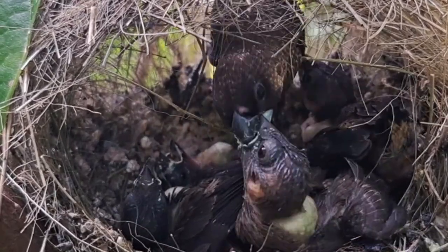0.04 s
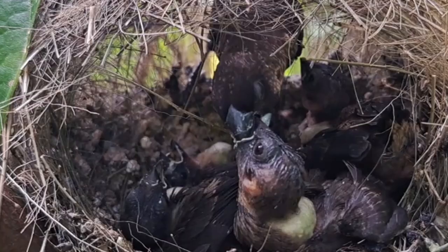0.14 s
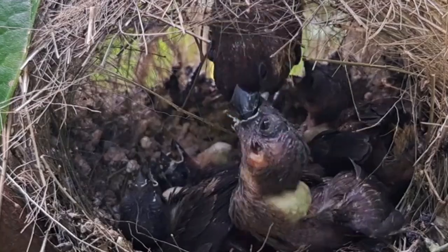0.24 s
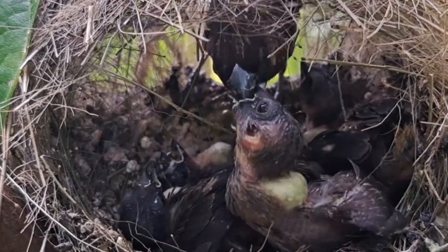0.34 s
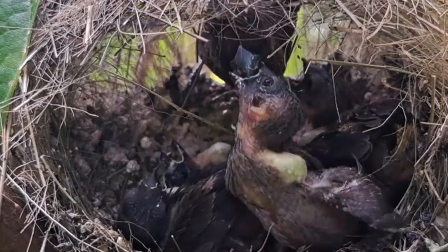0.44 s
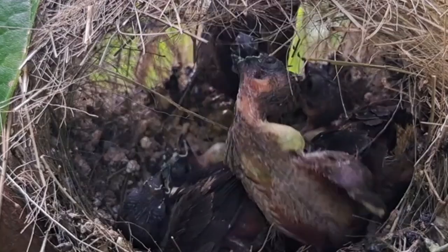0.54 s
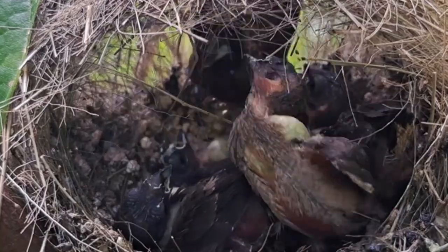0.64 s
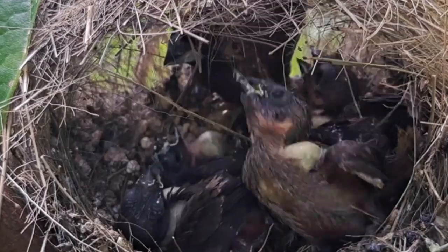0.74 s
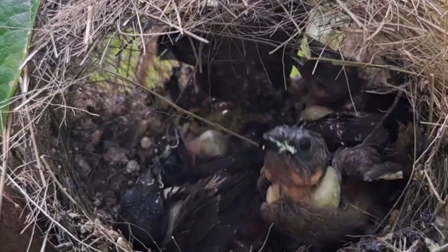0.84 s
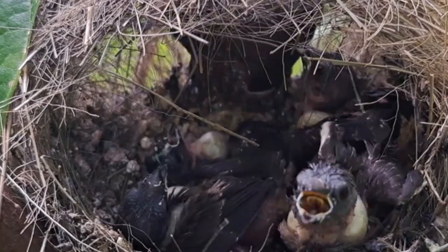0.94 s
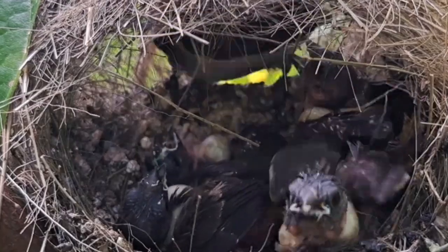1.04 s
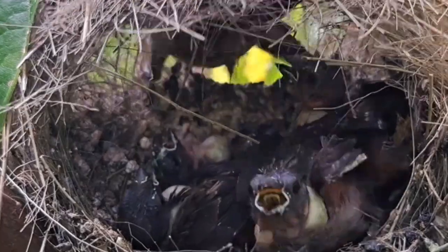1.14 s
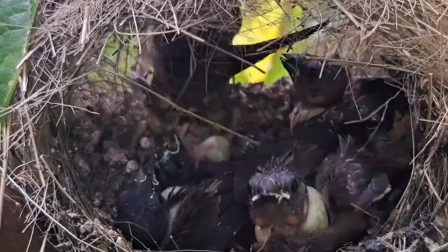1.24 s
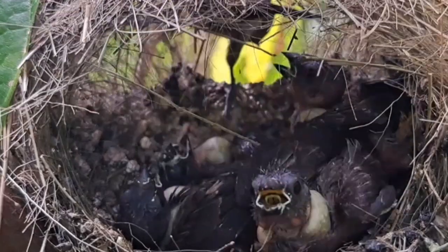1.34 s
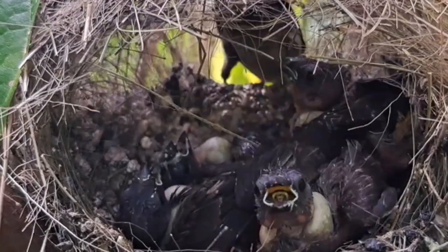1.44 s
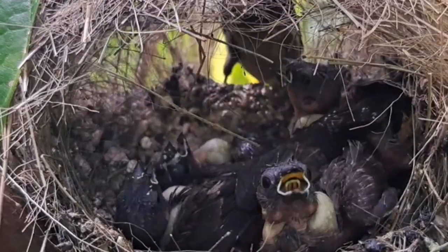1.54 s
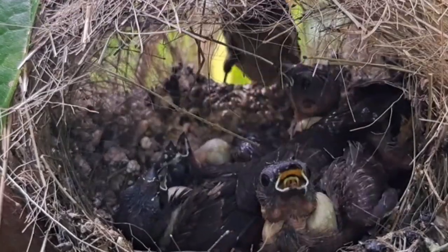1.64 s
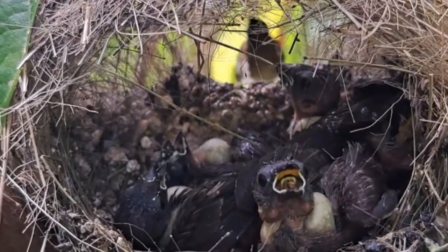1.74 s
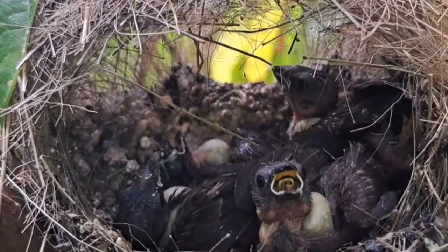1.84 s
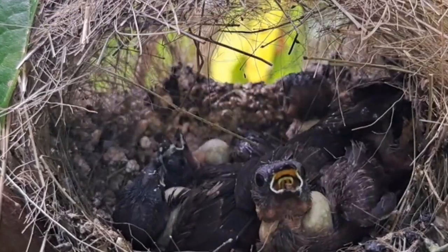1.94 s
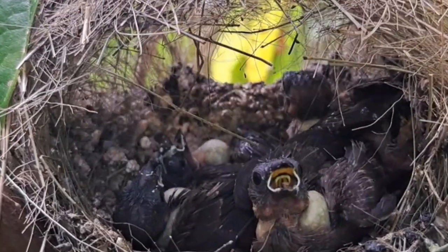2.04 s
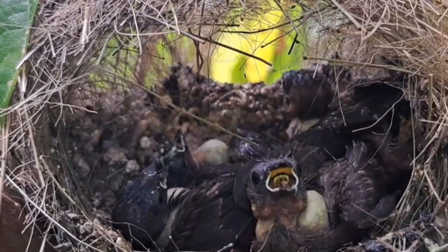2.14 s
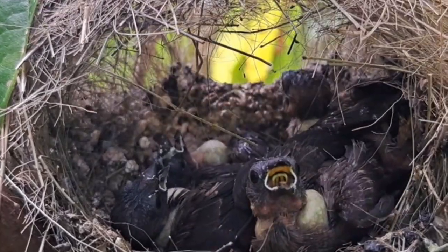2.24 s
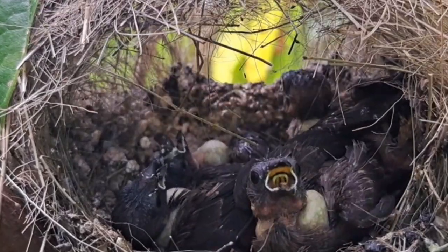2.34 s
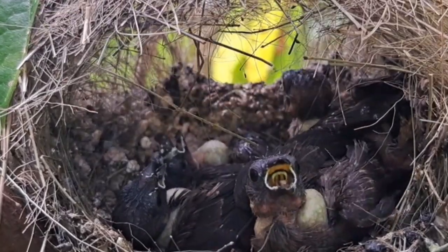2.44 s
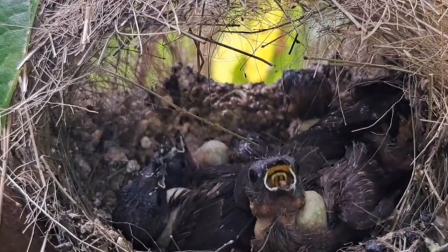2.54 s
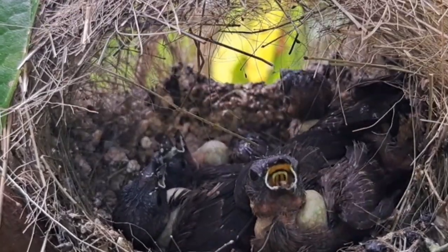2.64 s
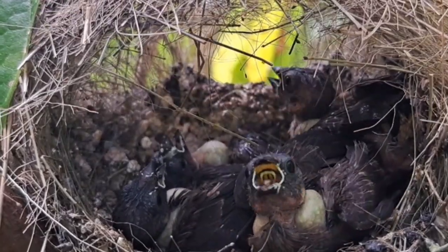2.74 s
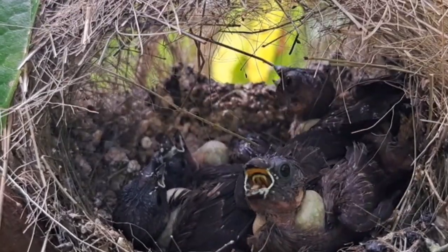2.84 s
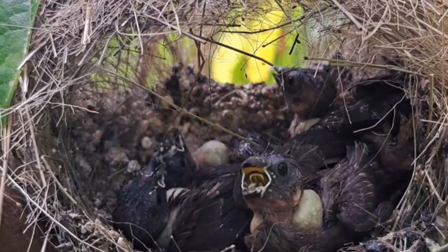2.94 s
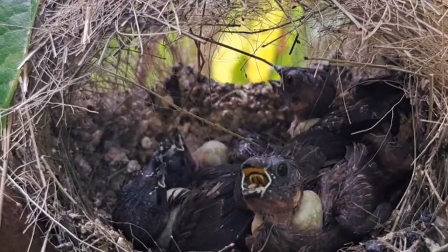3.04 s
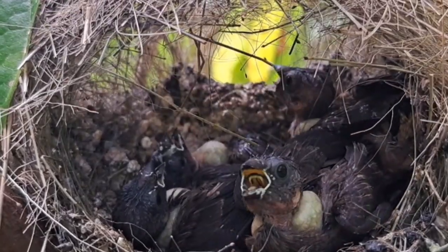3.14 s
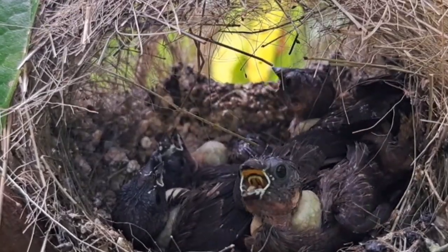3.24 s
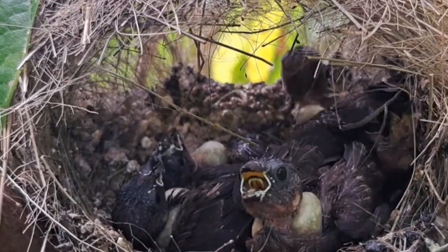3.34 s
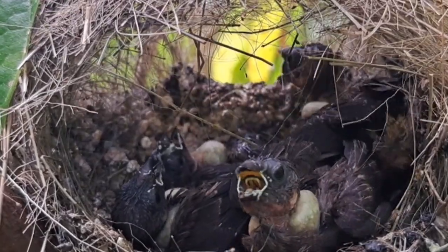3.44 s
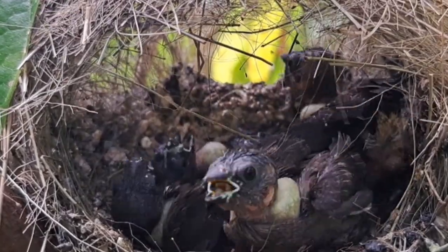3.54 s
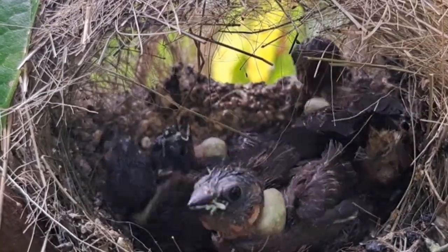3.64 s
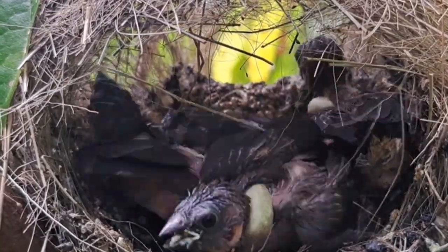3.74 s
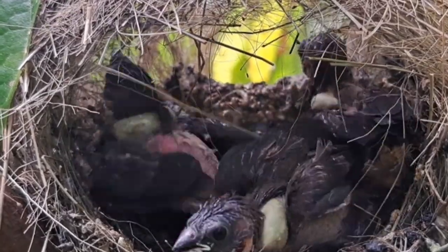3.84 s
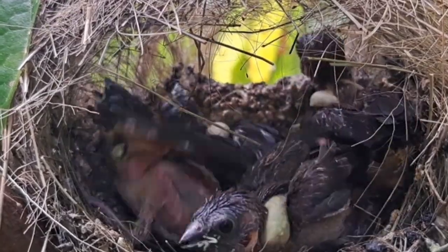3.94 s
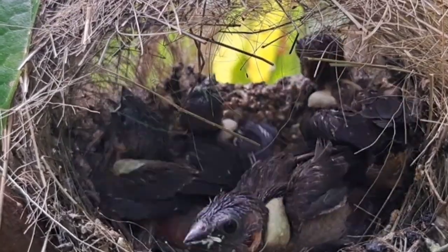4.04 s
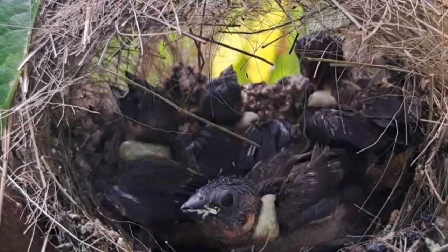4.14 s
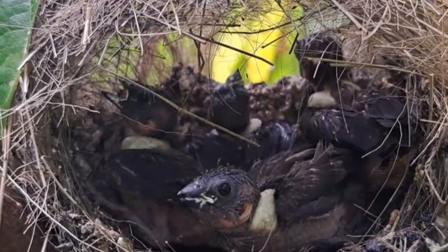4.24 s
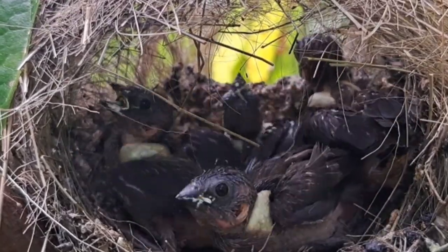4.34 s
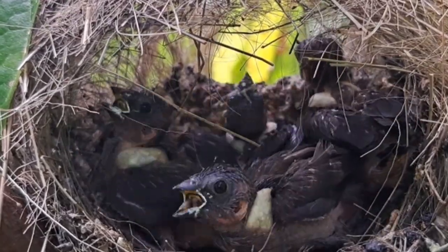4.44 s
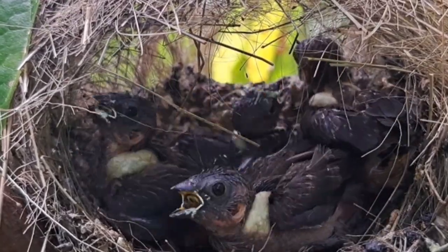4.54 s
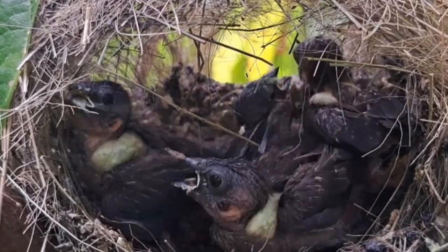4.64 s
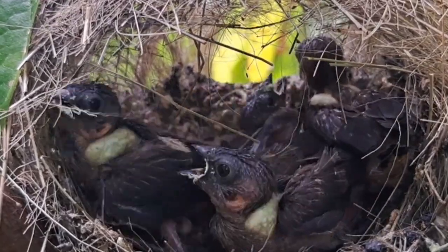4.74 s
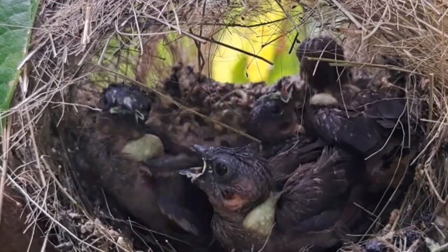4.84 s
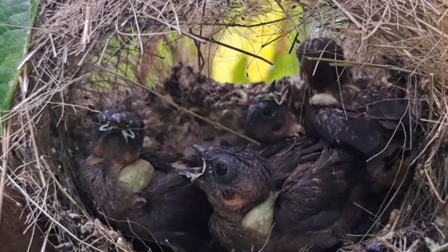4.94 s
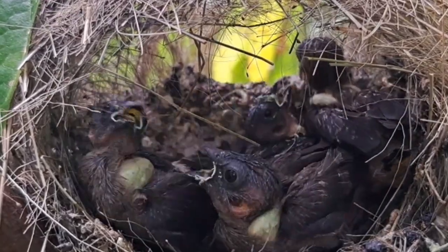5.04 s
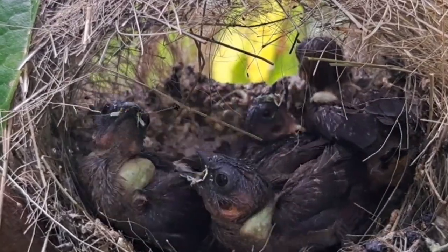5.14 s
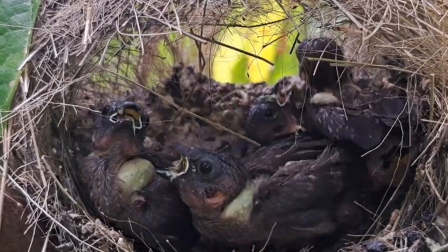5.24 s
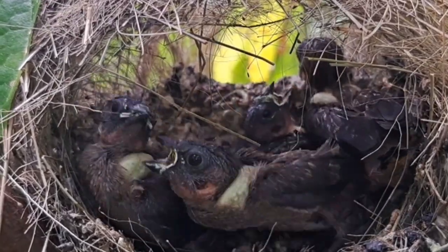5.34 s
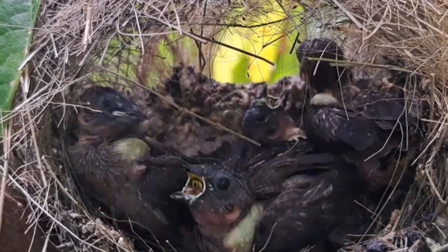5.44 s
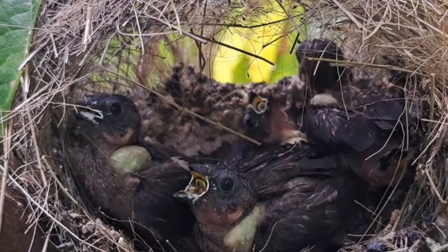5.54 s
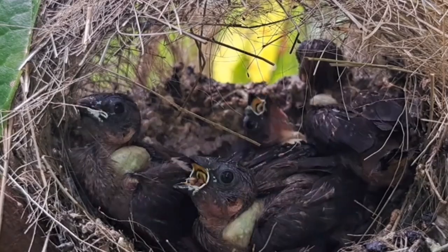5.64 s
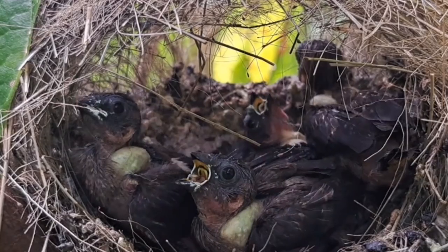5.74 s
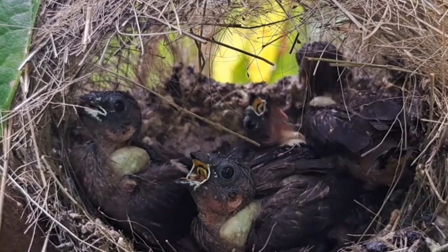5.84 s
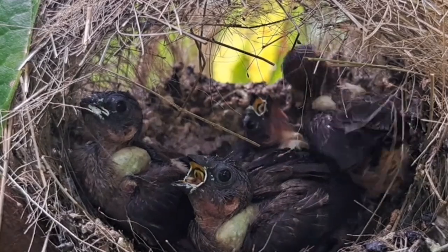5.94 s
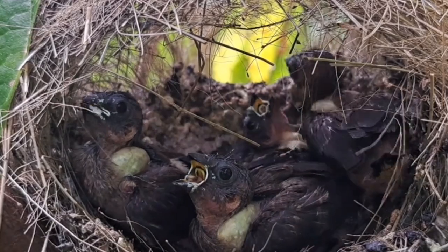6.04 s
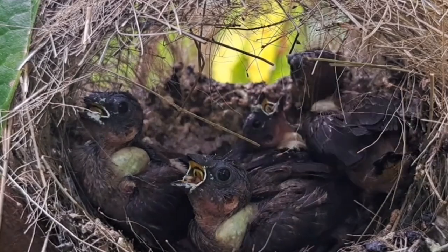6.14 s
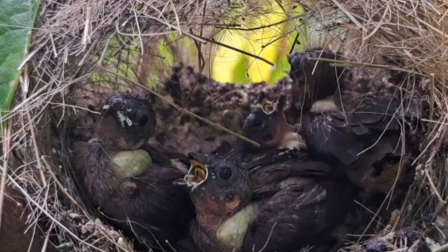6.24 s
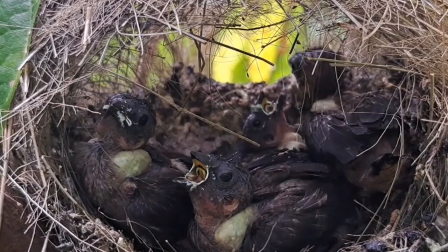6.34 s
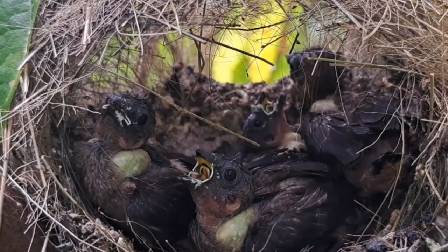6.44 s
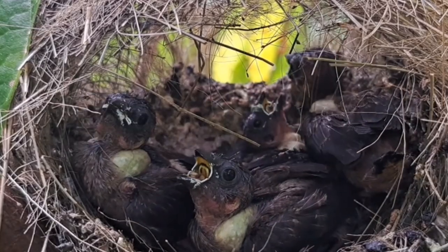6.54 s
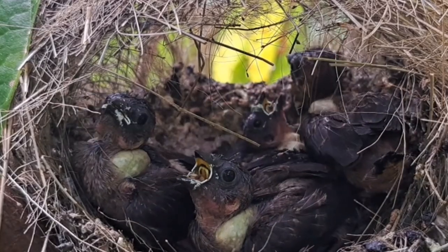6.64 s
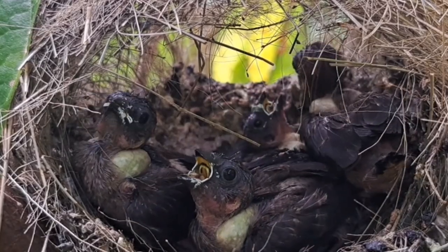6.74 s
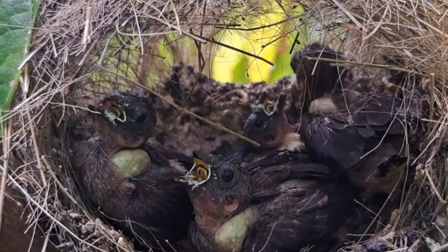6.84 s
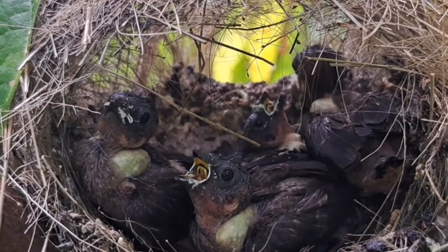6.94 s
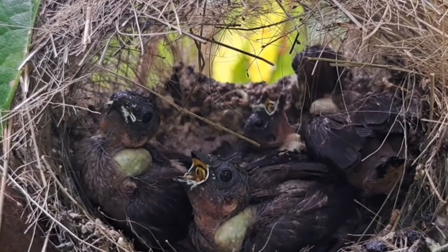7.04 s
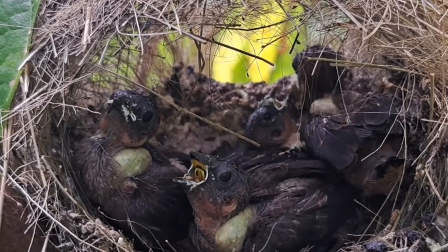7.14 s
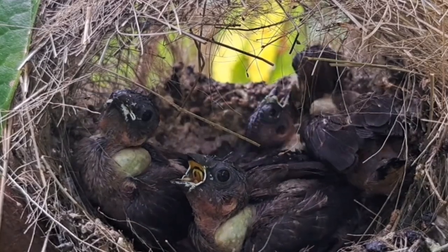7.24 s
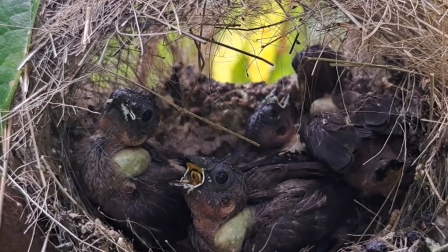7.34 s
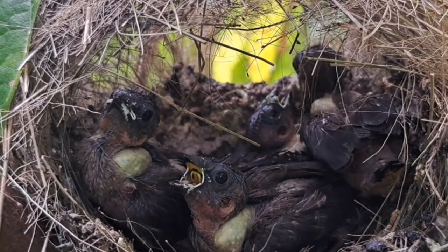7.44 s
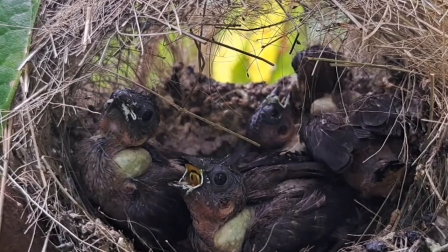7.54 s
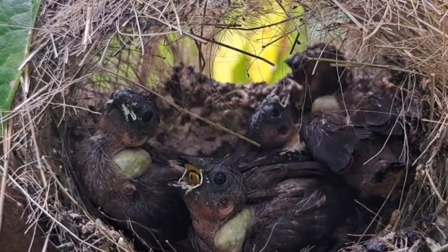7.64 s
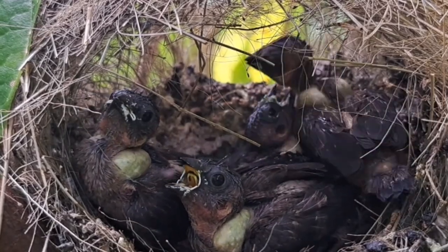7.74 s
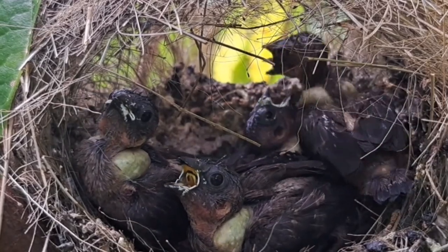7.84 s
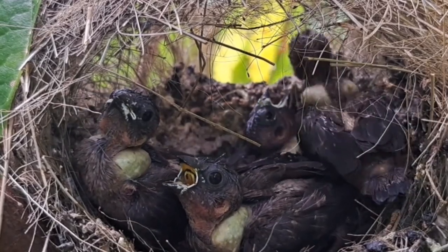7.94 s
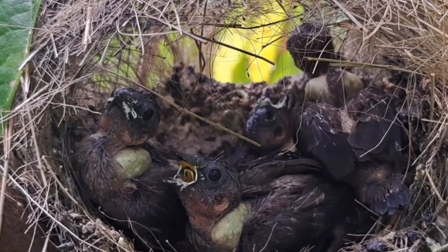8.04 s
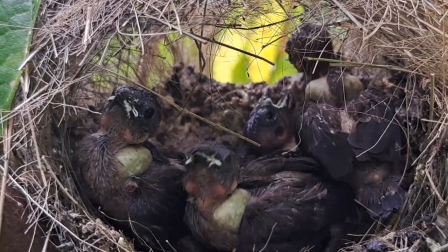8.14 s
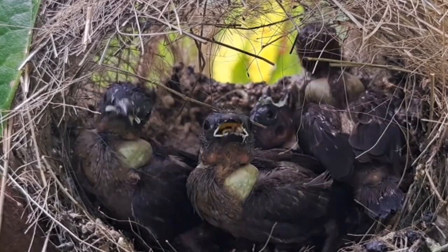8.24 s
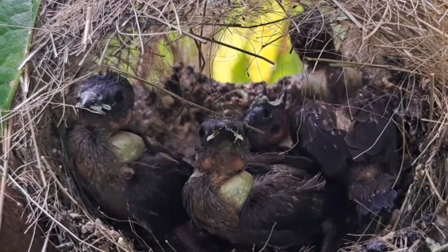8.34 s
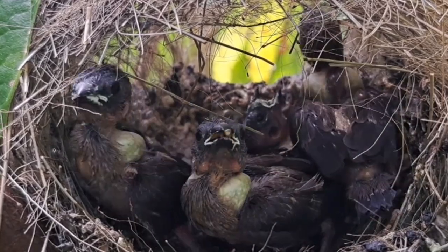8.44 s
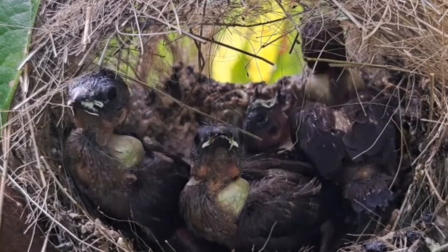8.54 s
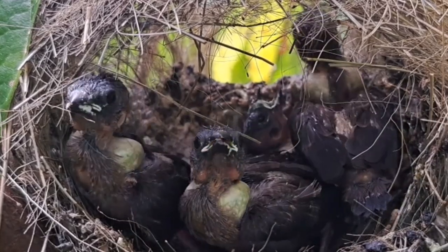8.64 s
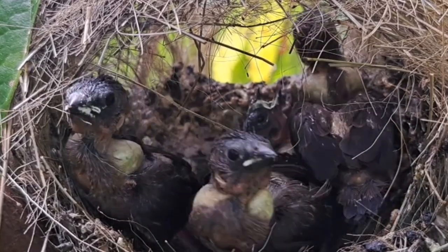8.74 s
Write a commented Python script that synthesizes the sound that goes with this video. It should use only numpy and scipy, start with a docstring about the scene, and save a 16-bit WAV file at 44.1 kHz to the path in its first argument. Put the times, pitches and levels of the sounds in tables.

```python
"""Nestlings beg in a small woven grass nest, close to a stereo microphone. Each chirp is a puff of air
and a membrane whistle that scoops up, climbs and hooks down, in one of four voices: clear, raspy, buzzy,
swelling. The calls overlap while a parent visits and thin out after it flutters away. The chicks bump
the nest. Outside, a faint insect-like trill comes and goes over a low rumble and a far engine."""
import sys
import numpy as np
from scipy import signal
from scipy.fft import rfft, irfft, next_fast_len
from scipy.io import wavfile
from scipy.ndimage import uniform_filter1d, minimum_filter1d, map_coordinates

SR = 44100
rng = np.random.default_rng(int(sys.argv[2]) if len(sys.argv) > 2 else 0)


def to_wav(sig):
    """Store sig (one row per channel, or 1-D mono) as 16-bit WAV at the path in sys.argv[1].

    Samples outside -1..1 are clipped; the rate is SR.
    """
    pcm = np.clip(np.atleast_2d(sig), -1, 1) * 32767
    pcm = np.round(pcm).astype(np.int16)
    wavfile.write(sys.argv[1], SR, pcm.T)  # frames by channels


N = 388080  # 8.8 s
BAND_LIMIT_HZ = 15550
HOOK_S, AIR_LEAD_S = 0.021, 0.022  # closing pitch drop; air starts ahead of the whistle


def amp(db):
    """Decibels to gain."""
    return 10 ** (np.asarray(db) / 20)


def unit(x):
    """Scale to rms 1."""
    return x / np.sqrt(np.mean(x ** 2) + 1e-20)


def ramp(x):
    """Smooth step from 0 to 1."""
    return np.sin(np.pi / 2 * np.clip(x, 0, 1)) ** 2


def wobble(knots_per_s, size):
    """Smooth random curve, rms near 1."""
    knots = rng.standard_normal(int(size * knots_per_s / SR) + 2)
    return map_coordinates(knots, [np.arange(size) * knots_per_s / SR], mode="nearest")


def along(points, hz):
    """Interpolate (Hz, value) points on a log frequency axis."""
    points_hz, values = np.transpose(points)
    return np.interp(np.log(hz + 1), np.log(points_hz), values)


def filtered(x, response):
    """Apply a frequency response, given as a function of Hz."""
    size = x.shape[-1]
    padded = next_fast_len(size + 1024)
    return irfft(rfft(x, padded) * response(np.fft.rfftfreq(padded, 1 / SR)), padded)[..., :size]


def noise(colour, shape):
    """Noise of rms 1 with a (Hz, dB) spectrum."""
    return unit(filtered(rng.standard_normal(shape), lambda hz: amp(along(colour, hz))))


def add(track, start_s, sound):
    """Mix a sound into a track."""
    at = round(start_s * SR) + np.arange(sound.shape[-1])
    inside = (at >= 0) & (at < N)
    track[..., at[inside]] += sound[..., inside]


def outdoors():
    """Uneven low rumble, partly shared by both microphones, under a faint even hiss of air."""
    # Rumble envelope. Each row: time in seconds, level in dB.
    rumble_levels = [(.7, -35.5), (1.15, -45), (1.8, -37.5), (3.3, -40.5), (4.1, -37), (5.7, -32.5),
                     (7.4, -37), (8.5, -35.5)]
    # Spectra of rumble and air. Each row: frequency in Hz, level in dB.
    rumble_colour = [(16, -46), (28, -8.5), (59, 0.5), (129, -5), (261, -12.5), (726, -35.5), (1200, -43.5),
                     (1560, -56), (2640, -120)]
    air_colour = [(600, -4.5), (3500, 0), (10000, -8.5), (15500, -6)]
    level_db = np.interp(np.arange(N) / SR, *np.transpose(rumble_levels)) + 2 * wobble(12, N)
    rumble = unit(noise(rumble_colour, N) + 1.3 * noise(rumble_colour, (2, N)))
    lean_db = np.array([[-1.5], [1.5]])
    return amp(level_db + lean_db) * rumble + amp(-53) * noise(air_colour, (2, N))


def engine():
    """A far engine speeds up, changes gear and pulls on; only its low orders carry."""
    # Engine speed. Each row: time in seconds, firing rate in Hz.
    speeds = [(4, 55.13), (5, 64.67), (5.85, 72.77), (6.05, 61.1), (7.4, 64.22), (8.8, 67.2)]
    # Harmonics. Each row: multiple of the firing rate, level in dB.
    orders = [(1, -49), (2, -49), (3, -60.5), (4, -52.5), (6, -60), (8, -66.5)]
    t = np.arange(N) / SR
    firing_hz = np.interp(t, *np.transpose(speeds)) * (1 + 0.0066 * wobble(11, N))
    phase = 2 * np.pi * np.cumsum(firing_hz) / SR
    hum = sum(amp(db + 3 * wobble(5, N)) * np.sin(k * phase) for k, db in orders)
    return np.sqrt(2) * ramp((t - 3.8) / 2.29) * hum


def insect():
    """Fast pulses ring a narrow resonance, swelling in phrases; a thin high shimmer runs throughout."""
    # Trill phrases. Each row: start in seconds, end in seconds, level in dB.
    trills = [(2.144, 2.483, -50.5), (3.038, 3.42, -50), (6.616, 7.013, -49.5), (7.478, 7.774, -51)]
    pulse_hz, floor_db = 55, -60
    t = np.arange(N) / SR
    phrases = sum(amp(db) * ramp((t - start_s) / 0.048) * ramp((end_s - t) / 0.082)
                  for start_s, end_s, db in trills)
    pulses = amp(3 * np.sin(2 * np.pi * pulse_hz * t + wobble(4.3, N)))
    ring = noise([(3900, -67), (4600, -7.5), (4900, -1.5), (5600, -55)], (2, N))
    shimmer_db = -62.5 + 3 * wobble(2.3, N)
    shimmer = amp(shimmer_db) * noise([(10300, -33.5), (11250, -6.5), (12200, -35.5)], (2, N))
    return (phrases + amp(floor_db)) * unit(pulses * ring) + shimmer


def nest_bumps():
    """Bodies bump the soft nest: short, dull thuds."""
    # Bumps. Each row: start in seconds, relative level in dB.
    bumps = [(0.747, -33), (2.26, -29), (2.292, -21), (2.637, -22.5), (3.859, -25.5), (4.27, -29.5),
             (5.272, -18)]
    attack_s, t60_s = 0.006, 0.099
    t = np.arange(N) / SR
    pushes = sum(amp(db + 5.5) * ramp((t - at_s) / attack_s) * amp(-60 * np.maximum(t - at_s, 0) / t60_s)
                 for at_s, db in bumps)
    return pushes * noise([(20, 12), (55, 5.5), (400, -15), (1200, -62.5)], N)


def wings():
    """The parent's wingbeats pulse low noise as it leaves."""
    beat_hz = 26
    t = np.arange(N) / SR
    beats = amp(-33 + 6.9 * np.sin(2 * np.pi * beat_hz * t))
    flight = ramp((t - 1.85) / 0.042) * ramp((2.2 - t) / 0.21)
    return beats * flight * noise([(80, 4.5), (400, -18), (1100, -27), (6000, -51)], (2, N))


def turbulence(length_s, db, voice):
    """Envelope of the air noise in the throat: an onset puff, then a sputter through the call."""
    puff_s, rise_s, fall_s = 0.01676, 0.029, 0.009
    t = np.arange(int((length_s + AIR_LEAD_S) * SR)) / SR - AIR_LEAD_S
    flow = amp(voice["puff_db"]) * np.exp(-(t / puff_s) ** 2) + amp(voice["air_db"])
    sputter_db = 3.42 * wobble(101.8, len(t)) + 3 * wobble(1200, len(t))
    return amp(db + sputter_db) * flow * ramp((t + AIR_LEAD_S) / rise_s) * ramp((length_s - t) / fall_s)


def pitch(t, length_s, db, voice):
    """Pitch in Hz: scoop up, climb in small uneven steps, hook down as the beak closes."""
    scoop_s, scoop_depth, hook_depth = 0.01, 0.38, 0.46
    step_hz, easing, ceiling_hz = 53.2, 0.2933, 5834
    lift_hz = 22 * (db + 15) + 3500 * (length_s - 0.1)  # louder and longer chirps climb higher
    top_hz = min(ceiling_hz, voice["top_hz"] + lift_hz)
    step_rad_s = 2 * np.pi * step_hz
    stepped_s = t + np.sin(step_rad_s * t + 2 * wobble(25, len(t))) / step_rad_s
    to_go = 1 - np.clip((stepped_s - scoop_s) / (length_s - scoop_s - HOOK_S), 0, 1)
    to_go -= easing * np.sin(2 * np.pi * to_go) / (2 * np.pi)
    climb_hz = top_hz - voice["climb_hz_per_s"] * length_s * to_go
    scoop = 1 - scoop_depth * np.clip(1 - t / scoop_s, 0, 1) ** 2
    hook = 1 - hook_depth * np.clip(1 - (length_s - t) / HOOK_S, 0, 1) ** 3
    waver = 1 + 0.009 * to_go * wobble(77, len(t))
    return climb_hz * scoop * hook * waver


def whistle(length_s, db, bright_db, voice):
    """The membrane starts weakly, skipping alternate cycles, and locks into a full tone as pitch rises."""
    # Throat response (fundamental) and beak response (other partials). Each row: frequency in Hz, gain in dB.
    throat = [(2500, -7), (3800, 0), (4700, 1), (5600, 1.5), (6000, -0.5)]
    beak = [(1900, -14), (2400, -5.5), (6000, -2.5), (8500, 0.5), (10500, -0.5), (12000, -3), (13500, -5.5),
            (16000, -22)]
    attack_s, locking_s, release_s = 0.005, 0.006, 0.015
    bite_at_s, bite_s = 0.0088, 0.0046  # accent as the scoop lands
    t = np.arange(int(length_s * SR)) / SR
    size, progress = len(t), t / length_s
    hz = pitch(t, length_s, db, voice)
    phase = 2 * np.pi * np.cumsum(hz * (1 + voice["jitter"] * wobble(1500, size))) / SR
    lock_at_s = t[np.argmax(hz >= min(voice["lock_hz"], hz.max()))]
    opening = 1 - ramp((t - lock_at_s) / locking_s + 0.5)
    level_db = db + voice["opening_db"] * opening + voice["swell_db"] * (progress - 0.5)
    level_db += voice["flutter_db"] * wobble(130, size)
    tone = amp(level_db + along(throat, hz)) * np.sin(phase)

    def partial(k):
        """k times the pitch, fluttering on its own, coloured by the beak."""
        gain = amp(along(beak, k * hz) + 3 * wobble(110, size))
        return gain * (k * hz < BAND_LIMIT_HZ) * np.sin(k * phase)

    skipping = ramp((voice["half_share"] - progress) / 0.15 + 0.5) * ramp(t / 0.009)
    halves = partial(1 / 2) + partial(3 / 2) + partial(5 / 2) / 2
    partials = amp(voice["octave_db"]) * partial(2) + amp(voice["third_db"]) * partial(3)
    partials += amp(voice["half_db"]) * skipping * halves
    partials *= amp(0.69 * db + bright_db) * ramp((length_s - t) / HOOK_S)
    # A slower second vibration adds sidebands; turbulence frays the tone.
    sidebands = amp(voice["sideband_db"]) * np.cos(0.32 * phase + wobble(400, size))
    husk = amp(voice["husk_db"]) * wobble(2600, size)
    bite = amp(voice["bite_db"] * np.exp(-((t - bite_at_s) / bite_s) ** 2))
    envelope = ramp(t / attack_s) * ramp((length_s - t) / release_s) * bite
    return np.sqrt(2) * envelope * (1 + sidebands + husk) * (tone + partials)


def chirps(calls, voice):
    """One voice's calls: whistle plus rasping air. Brighter calls have more overtones and sizzle."""
    # Spectra of the rasp and its sizzling top. Each row: frequency in Hz, level in dB.
    rasp_colour = [(1000, -32.5), (1800, -8.5), (4500, 6.5), (7800, 3.5), (9000, -8.5), (11500, -19.5),
                   (15000, -31.5)]
    sizzle_colour = [(6500, -24), (9500, 1), (11500, 1), (14000, -10.5), (15500, -13.5)]
    tones, rasp, sizzle = np.zeros((3, N))
    for start_s, length_s, db, bright_db in calls:
        flow = turbulence(length_s, db, voice)
        add(tones, start_s, whistle(length_s, db, bright_db, voice))
        add(rasp, start_s - AIR_LEAD_S, flow)
        add(sizzle, start_s - AIR_LEAD_S, amp(bright_db - 17.5) * flow)
    return tones + rasp * noise(rasp_colour, N) + sizzle * noise(sizzle_colour, N)


def placed(x, lead_ms, pan_db):
    """A source nearer the left microphone reaches it earlier and, at most frequencies, louder."""
    # Channel balance. Each row: frequency in Hz, left over right in dB (added to pan_db).
    left_lean = [(1500, 10.5), (3500, 1.5), (5400, -3), (8000, 4), (12000, 3)]
    side = np.array([[0.5], [-0.5]])
    return filtered(x, lambda hz: amp(side * (pan_db + along(left_lean, hz)))
                    * np.exp(2j * np.pi * hz * side * lead_ms / 1000))


def nest_walls(x):
    """The woven walls scatter a very short, weak reflection."""
    early_t60_s, late_t60_s = 0.006, 0.1
    t = np.arange(SR // 10) / SR
    decay = amp(-60 * t / early_t60_s) + amp(-24 - 60 * t / late_t60_s)
    tail = rng.standard_normal((2, len(t))) * decay * ramp(t / 0.001)
    return x + amp(-7.5) * signal.fftconvolve(x, tail / np.linalg.norm(tail[0]), axes=1)[:, :N]


def nestlings():
    """Four begging voices, each from its own spot in the nest."""
    # Chirps per voice. Each row: start in seconds, length in seconds, level in dB, brightness in dB.
    clear_calls = [(-.06, 0.10945, -6, 0), (.276, 0.076, -11, -0.5), (.353, 0.0537, -2.5, 0.5),
                   (.539, 0.13, -6, 3.5), (.751, 0.12, -6.5, 4.5), (.959, 0.12, -8, 3),
                   (1.188, 0.1294, -6, -0.5), (1.427, 0.1173, -7.5, -2.5), (1.726, 0.12, -7.5, -0.5),
                   (2.063, 0.13, -6.5, -1), (3.496, 0.11, -8.5, 8.5), (3.731, 0.12, -3.5, 1)]
    raspy_calls = [(.124, 0.12, -13.5, -2), (.425, 0.13, -11, 0), (.68, 0.1301, -12.5, -0.5),
                   (.909, 0.13, -13.5, -6), (1.211, 0.1303, -13, -4.5), (1.55, 0.12, -12, -1),
                   (1.944, 0.095, -16.5, 2), (3.521, 0.1194, -13.5, 7), (3.747, 0.12, -18, 4.5),
                   (4.063, 0.12, -17, 0.5), (4.432, 0.0956, -24, 10.5), (4.598, 0.1, -24, 5.5),
                   (4.781, .103, -23, 3), (5.183, 0.1026, -19.5, -0.5), (5.353, .1, -20.5, 1),
                   (5.537, 0.11, -18, -1), (5.718, 0.1024, -19, -2.5), (5.92, 0.0958, -20.5, -1.5)]
    buzzy_calls = [(1.04, 0.0804, -35.5, -2.5), (1.15, 0.0818, -26, 2), (1.305, 0.0888, -31, -6.5),
                   (1.825, 0.1, -31, 1), (2.455, .084, -32, 2.5), (2.683, 0.096, -28.5, 5.5),
                   (2.903, 0.096, -27, 5.5), (3.188, 0.0933, -28.5, 6.5), (3.431, 0.093, -25, 6),
                   (3.632, 0.11, -20, 5.5), (3.839, 0.0906, -23, -0.5), (4.235, 0.081, -23.5, 0.5),
                   (4.429, 0.0924, -25.5, 3.5), (5.784, 0.074, -21.5, -7.5), (6.147, 0.0892, -19.5, 3),
                   (6.335, 0.093, -20.5, 1), (6.562, 0.092, -21.5, 1.5), (6.799, 0.087, -23, -1),
                   (7.054, 0.0851, -24, -1), (7.275, 0.083, -22.5, 1.5), (7.716, 0.0813, -25.5, -1),
                   (7.93, 0.093, -24, 2), (8.187, 0.063, -31.5, -4.5), (8.485, 0.074, -25, 0.5),
                   (8.72, 0.06, -26.5, -1.5)]
    swelling_calls = [(3.992, .115, -8, -19.5), (4.24, .116, -8, -13.5), (4.969, 0.1354, -12, -7),
                      (5.453, 0.13, -13.5, 4), (6.057, 0.13, -13, 2.5), (7.101, .05, -16.5, 1),
                      (7.167, 0.066, -13.5, 2), (7.802, 0.13, -10.5, 5), (8.027, .114, -11, -1),
                      (8.294, 0.1326, -13.5, -1), (8.532, 0.12, -12.5, -2.5), (8.778, 0.138, -10, -7.5)]
    # opening_db: gain until the pitch reaches lock_hz. half_share: part of the call with half-harmonics.
    clear = dict(top_hz=5588, climb_hz_per_s=12836, opening_db=-12.5, lock_hz=4560, swell_db=-10.5,
                 bite_db=-2, octave_db=-30.5, third_db=-25, half_db=-40.5, half_share=0.11,
                 jitter=0.00037, flutter_db=1.16, sideband_db=-50.5, husk_db=-30.5,
                 puff_db=-20, air_db=-32.5)
    raspy = dict(top_hz=5593, climb_hz_per_s=15300, opening_db=-10.5, lock_hz=4379, swell_db=3,
                 bite_db=3, octave_db=-21.5, third_db=-37, half_db=-26.5, half_share=0.3,
                 jitter=0.012, flutter_db=1.5, sideband_db=-25, husk_db=-24, puff_db=-18, air_db=-15.5)
    buzzy = dict(top_hz=5277, climb_hz_per_s=15000, opening_db=-5.5, lock_hz=4427, swell_db=1.5,
                 bite_db=-3.5, octave_db=-25.5, third_db=-39, half_db=-20.5, half_share=0.7,
                 jitter=0.013, flutter_db=2.5, sideband_db=-31.5, husk_db=-19, puff_db=-36, air_db=-21)
    swelling = dict(top_hz=5830, climb_hz_per_s=12500, opening_db=-6, lock_hz=5172, swell_db=0.5,
                    bite_db=1.5, octave_db=-18.5, third_db=-31.5, half_db=-34.5, half_share=0.091,
                    jitter=0.0017, flutter_db=2, sideband_db=-41.5, husk_db=-37.5,
                    puff_db=-21.5, air_db=-31)
    return (placed(chirps(clear_calls, clear), lead_ms=0.1726, pan_db=2.5)
            + placed(chirps(raspy_calls, raspy), lead_ms=0.21, pan_db=5)
            + placed(chirps(buzzy_calls, buzzy), lead_ms=0.14, pan_db=6)
            + placed(chirps(swelling_calls, swelling), lead_ms=0.13, pan_db=4.5))


def scene():
    """The chicks in their nest, with the sounds around it."""
    return nest_walls(nestlings()) + insect() + nest_bumps() + wings() + outdoors() + engine()


def record(dry):
    """Fast peak limiter, then a brick-wall low-pass."""
    needed_gain = np.minimum(1, 0.95 / (np.abs(dry).max(axis=0) + 1e-9))
    gain = uniform_filter1d(minimum_filter1d(needed_gain, size=256), size=256)
    return filtered(dry * gain, lambda hz: hz < BAND_LIMIT_HZ)


dry = scene()
out = record(dry)
to_wav(out)
```